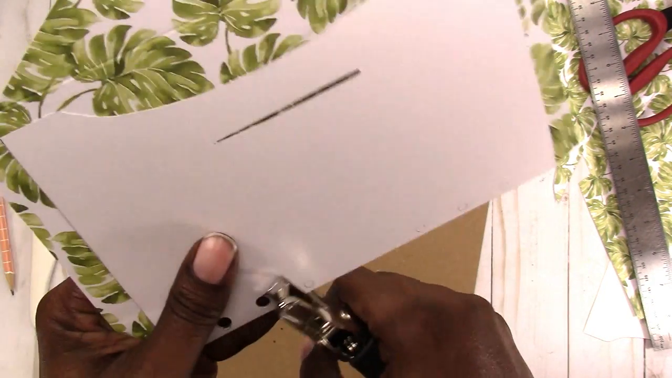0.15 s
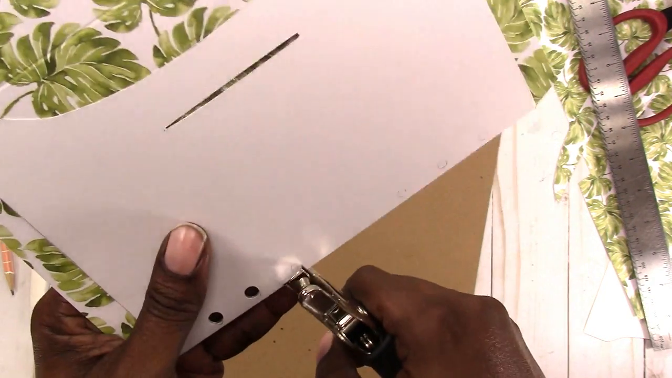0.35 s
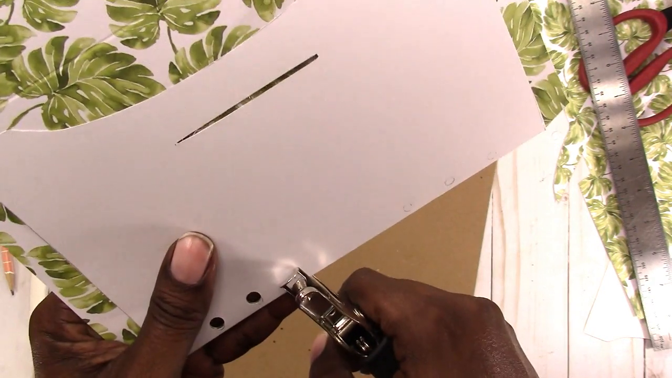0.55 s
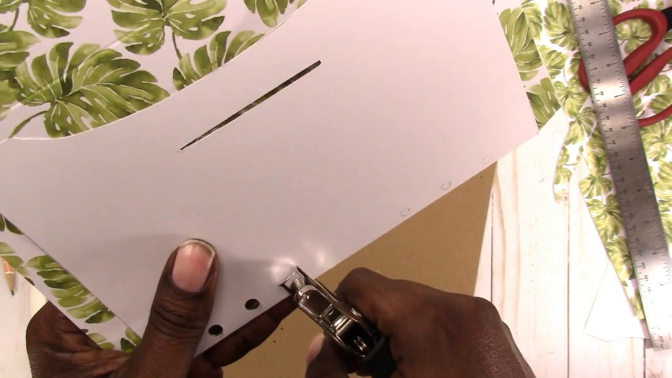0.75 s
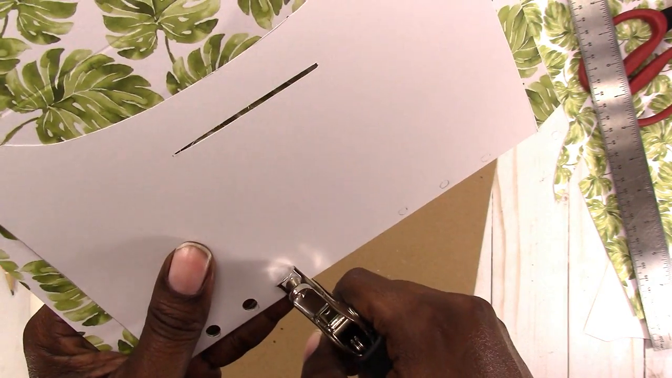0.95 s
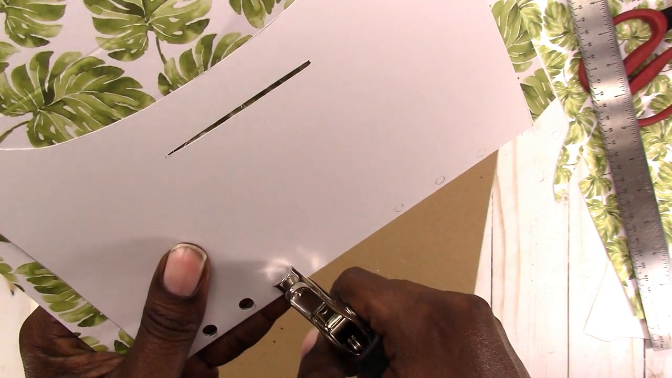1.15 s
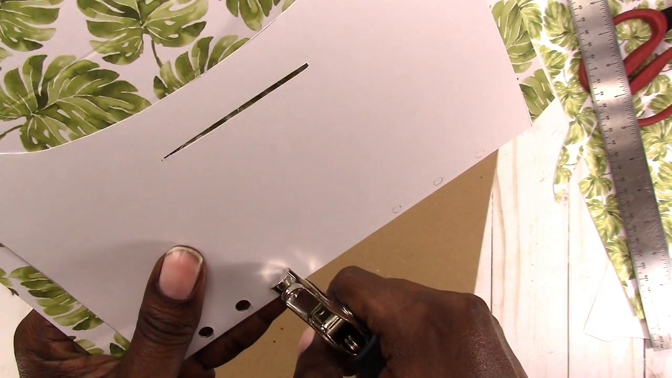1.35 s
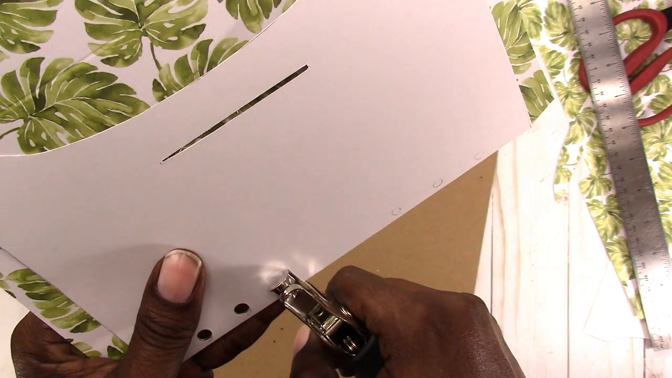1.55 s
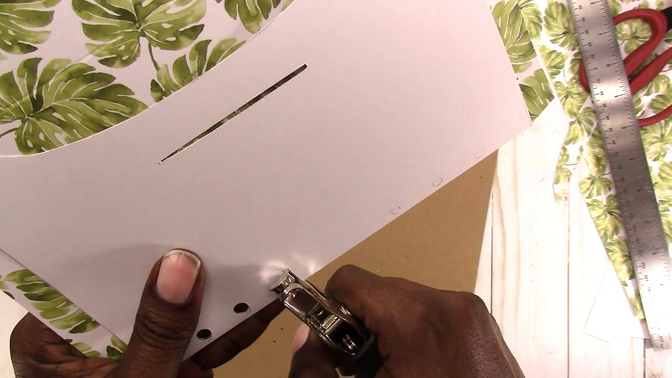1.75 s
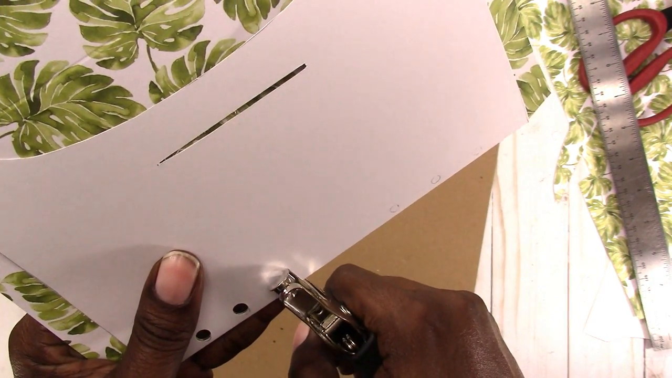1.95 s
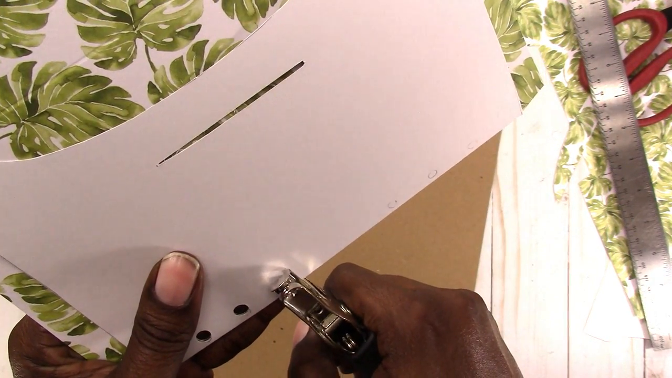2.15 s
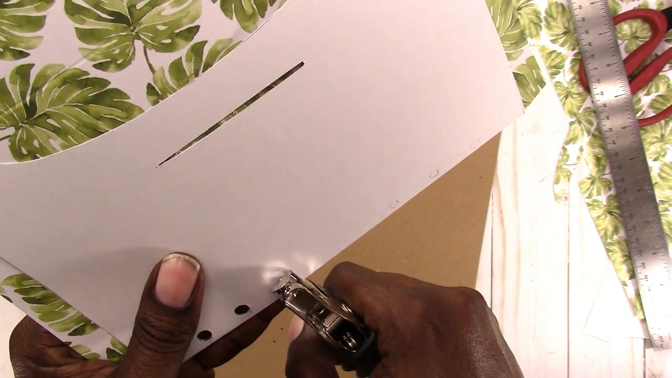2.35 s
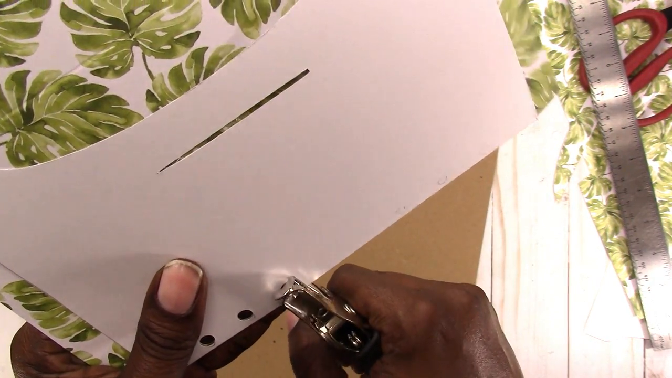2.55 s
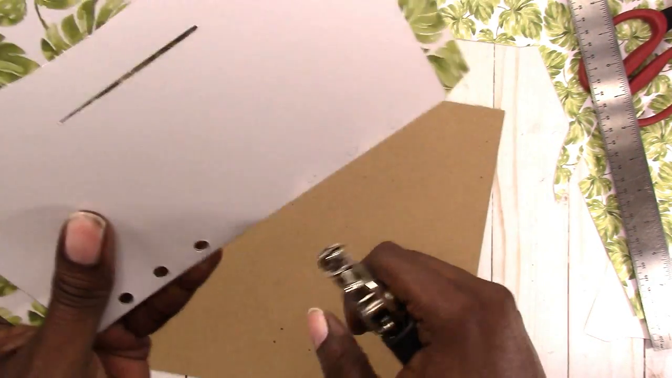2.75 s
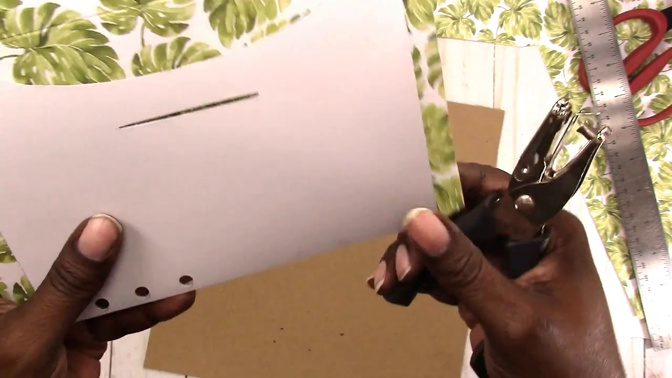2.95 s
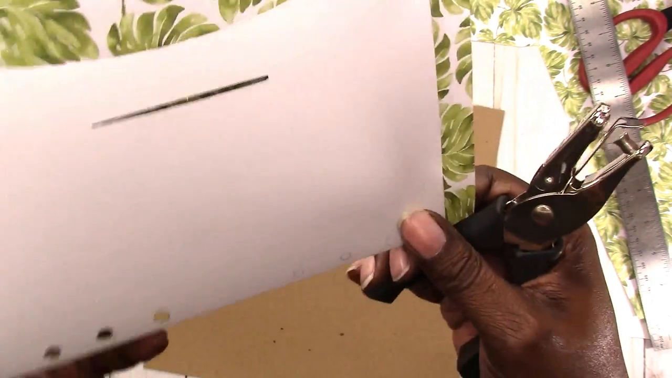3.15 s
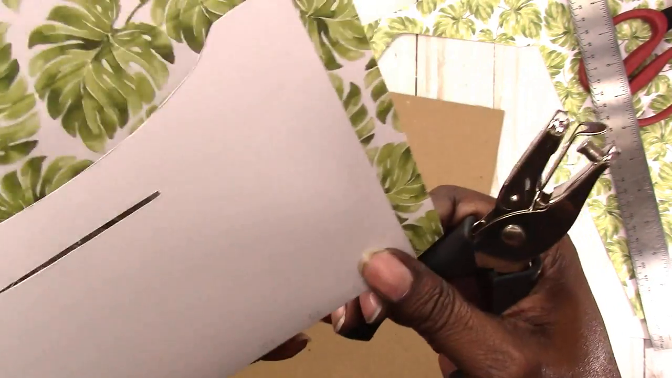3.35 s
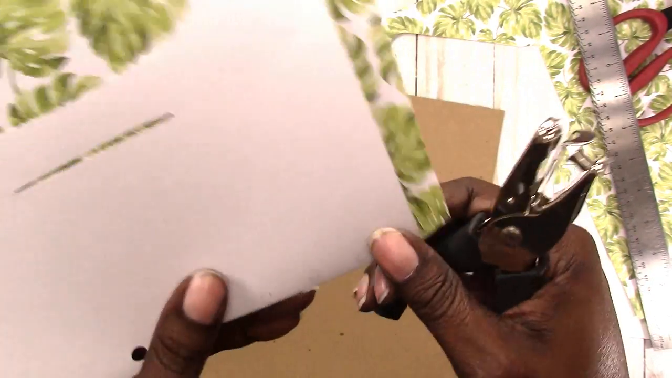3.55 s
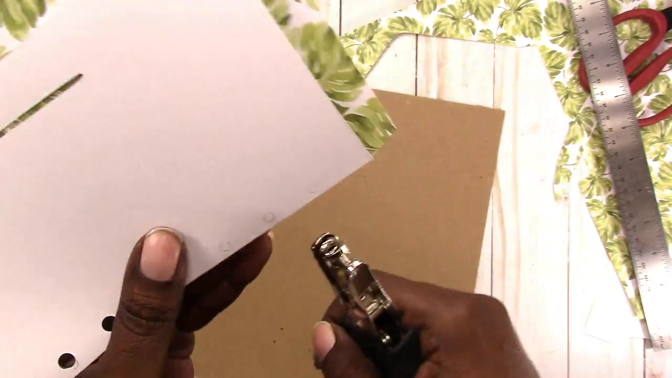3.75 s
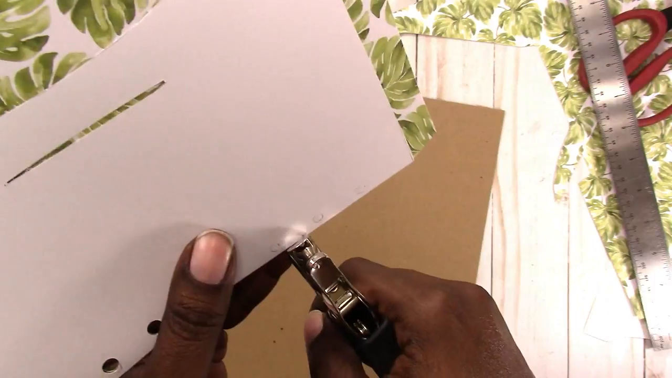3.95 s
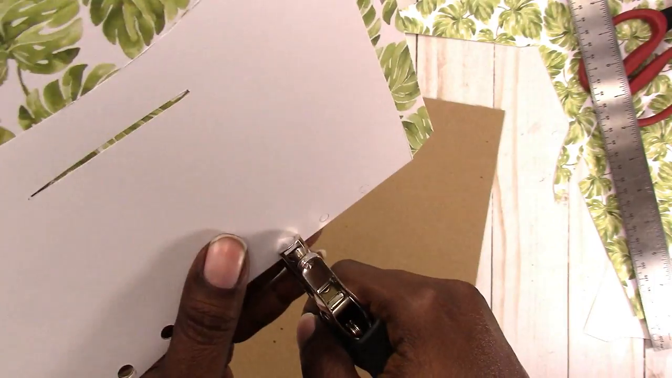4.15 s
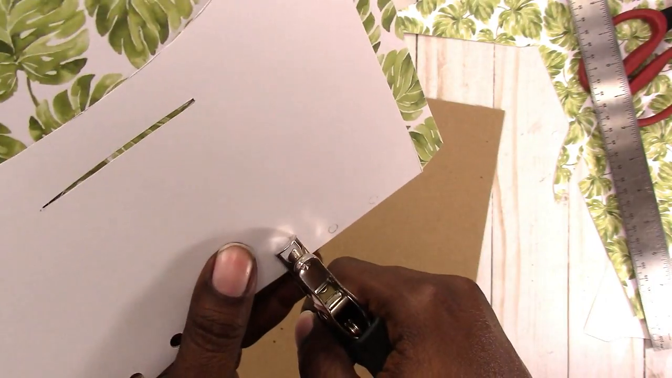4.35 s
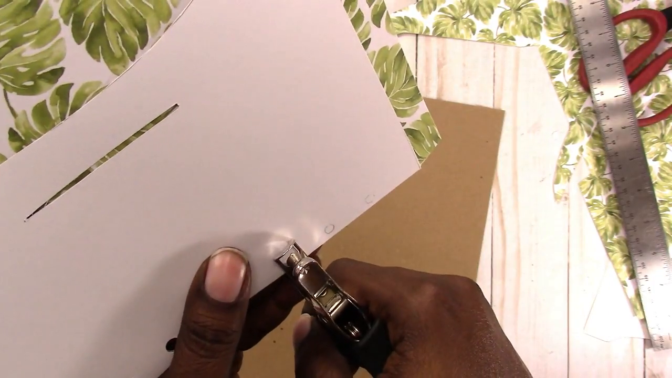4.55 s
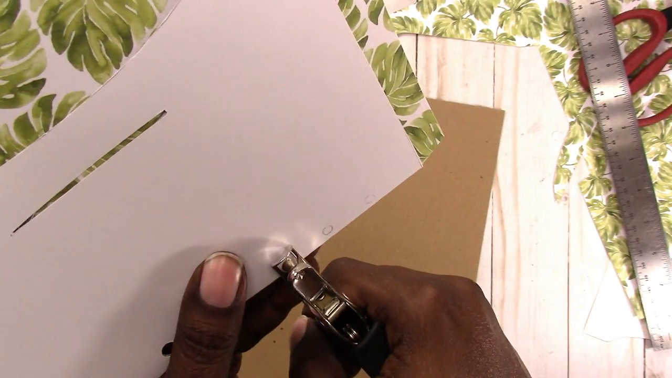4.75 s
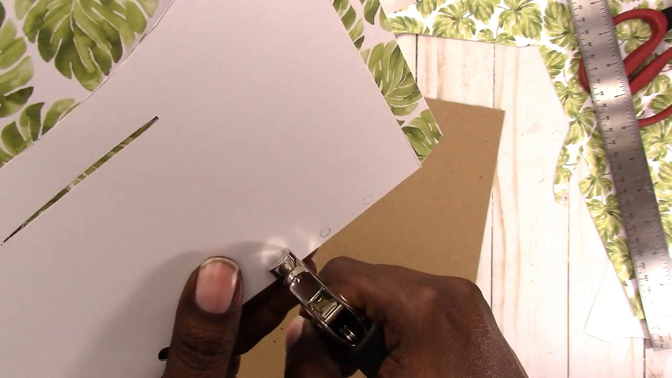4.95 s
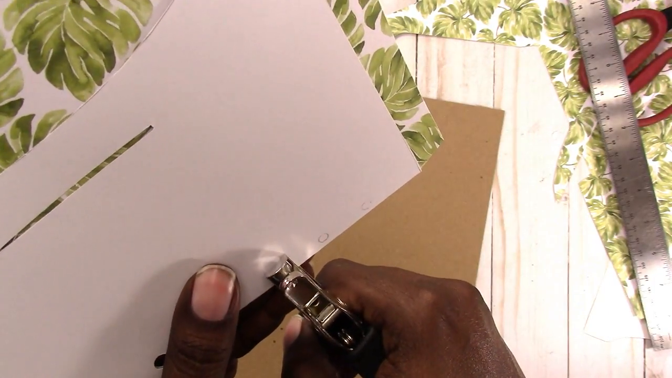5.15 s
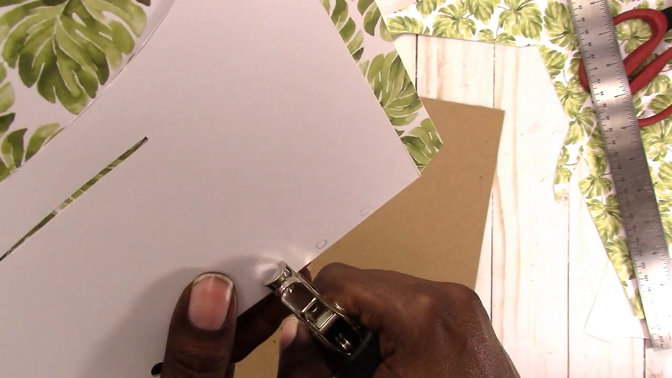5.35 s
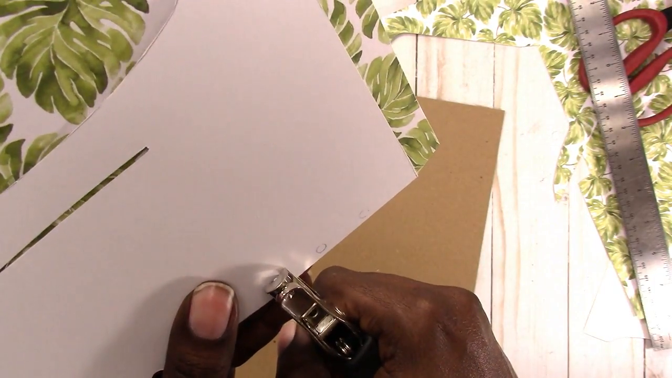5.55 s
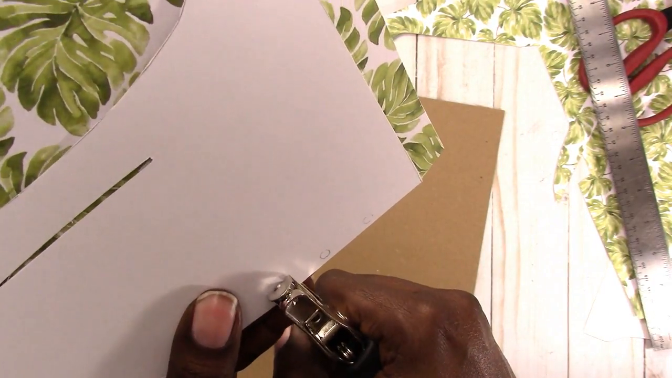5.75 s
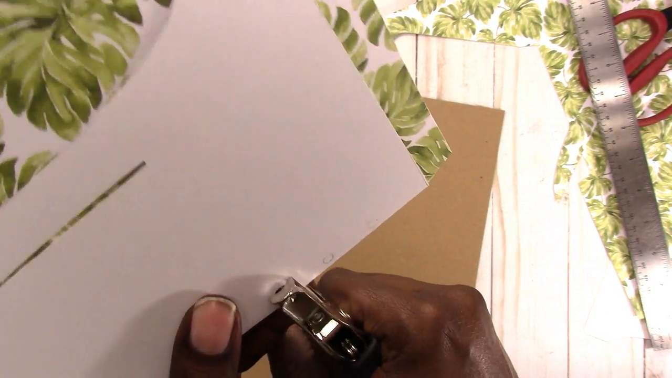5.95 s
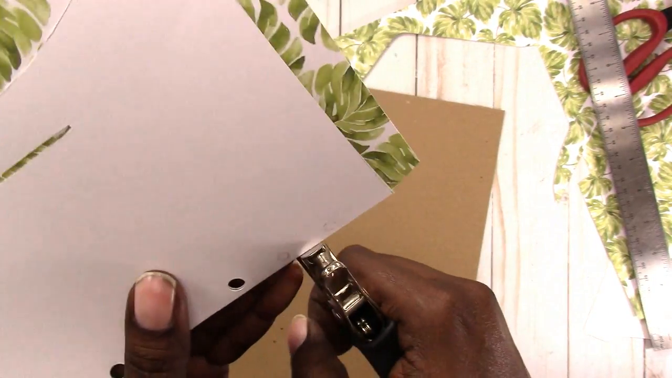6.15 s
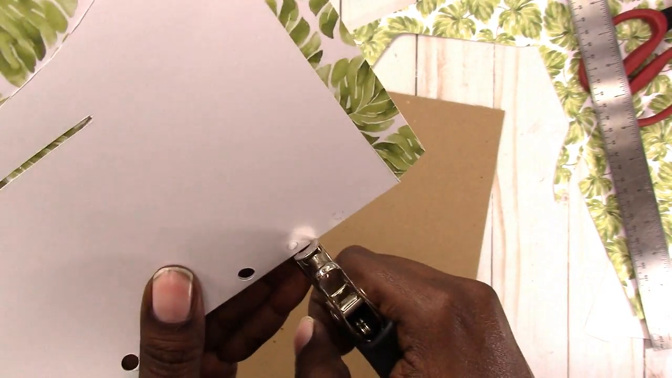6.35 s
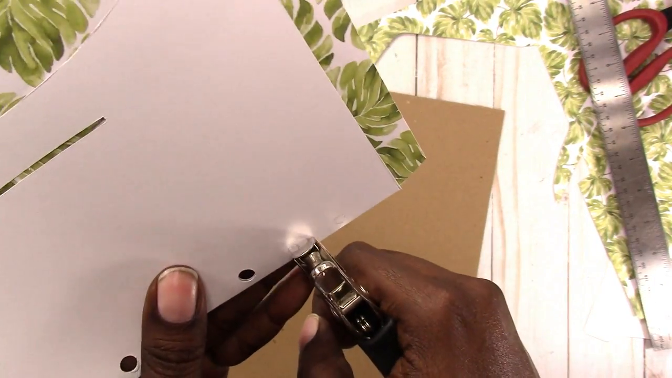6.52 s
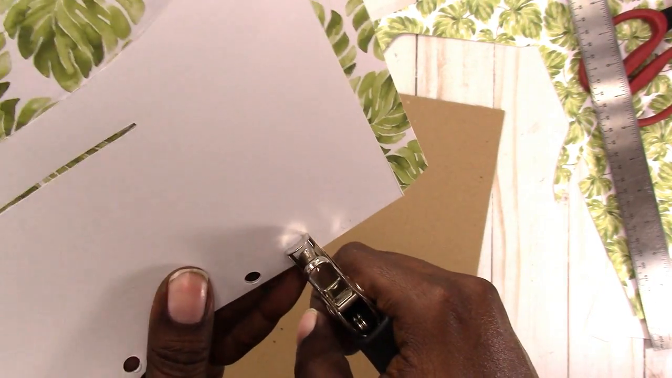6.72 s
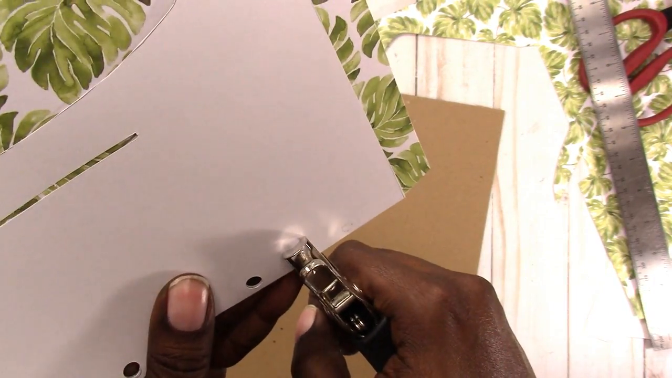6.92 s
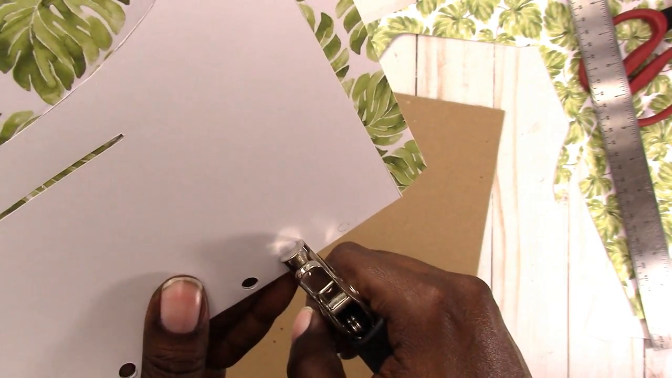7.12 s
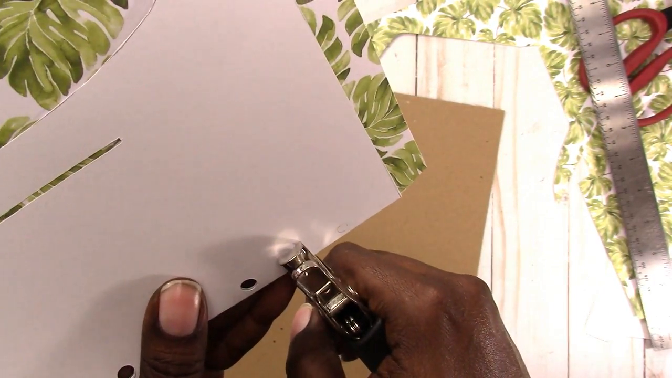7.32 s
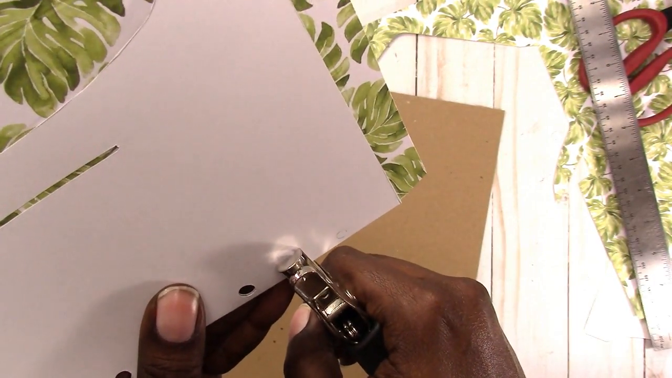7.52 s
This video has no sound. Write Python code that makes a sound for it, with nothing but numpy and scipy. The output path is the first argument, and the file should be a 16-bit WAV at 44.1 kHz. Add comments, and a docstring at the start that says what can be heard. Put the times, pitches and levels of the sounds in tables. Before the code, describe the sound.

A handheld steel punch clacks sharply through stiff card three times, each bite followed by a papery release snap, with a faint slide between.

```python
"""Plier punch and card

A steel plier punch cuts three holes in a sheet of card, over a craft table in a small room.
Each squeeze cracks the card by fibre noise and clacks on the stop by struck modes and a joint rattle.
On release the sheet flaps in its own modes; the pin's drag out of the last hole is a stick-slip pulse train.
The turned card slides as friction noise with a moving resonance, over coloured room noise and hum.
"""
import sys
import numpy as np
from scipy import signal
from scipy.fft import rfft, irfft
from scipy.io import wavfile
from scipy.ndimage import uniform_filter1d

SR = 44100
rng = np.random.default_rng(int(sys.argv[2]) if len(sys.argv) > 2 else 0)


def store_wav(level_fs):
    """Save 16-bit WAV to argv[1]."""
    pcm = np.round(np.clip(np.atleast_2d(level_fs), -1, 1) * 32767)
    wavfile.write(sys.argv[1], SR, pcm.T.astype(np.int16))


N = 338688

# the pin breaks through, then the jaws hit their stop:
# start_s, ring_db, stop_share (0-1), crack_db, crack_t60_s, sheet_jolt_db
SQUEEZES = [(-0.066, -1.5, 0.83, 4.5, 0.0095, -13), (2.529, -6.5, 0.3, -11.5, 0.022, -21),
            (2.5559, -2, 0.98, 2.5, 0.027, -7.5), (5.9132, -8.5, 0.12, -12, 0.024, -35),
            (5.9307, -2.5, 1, 1, 0.032, -13.5)]
# modes of the steel punch: mode_hz, breakthrough_db, stop_db, t60_s
STEEL_MODES = [(1007, -16, -4, 0.081), (1120, -10, -6, 0.033), (1240, -2.5, -16, 0.031),
               (1399, -14.5, -16.5, 0.14), (1571, -5.5, 1.5, 0.035), (1673, -3, -18, 0.035),
               (1853, 5, -25, 0.036), (2070, -4.5, -7.5, 0.037), (2630, -15, 3, 0.0124),
               (3196, -10, -0.5, 0.02), (4100, -9.5, -18.5, 0.0157), (4700, -22.5, -8, 0.021),
               (5016, -19.5, -4.5, 0.036), (5340, -11, -10.5, .018), (7190, -31.5, -5, 0.024)]
# spectrum of the breaking card: frequency_hz, density_db
CRACK_COLOUR = [(60, -15.5), (180, 2), (380, -9), (650, -2), (1100, 5), (2400, -1.5), (4700, 3.5),
                (6300, -5), (10000, -2.5), (13000, -12.5), (16000, -28.5)]
# spectrum of the loose joint: frequency_hz, density_db
RATTLE_COLOUR = [(500, -36), (900, -28), (1100, 17), (1350, -0.5), (1650, 4), (2100, 8), (2600, -18),
                 (5000, -32), (12000, -47)]

# the sheet jerks off the pin:
# start_s, flap_db, pitch_factor, slap_db, slap_t60_s, edge_tick_db, rebound_s
RELEASES = [(0.0898, -11, 0.97, -6, 0.063, -11, 0.0124), (2.7078, -4.5, 0.944, -15, 0.1, -13.5, 0.014),
            (6.0948, -11, 1.055, -16, 0.099, -13.5, 0.0094)]
# catch, jerk and rebound of every release, levels relative to it:
# delay_in_rebounds, flap_db, pitch_factor, slap_db, edge_tick_db
RECOIL = [(-1.2, -20, 0.88, -13.5, -15), (0, -0.5, 1, 0, -2), (0.97, -10.5, 1.22, -13, -21)]
# single swings and knocks of the sheet; a short stiff span rings higher:
# start_s, flap_db, pitch_factor, slap_db
FLAPS = [(0.1245, -15.5, 0.97, -46), (0.1305, -22, 0.95, -30), (0.164, -27, 0.61, -32.5),
         (0.2144, -26, 0.51, -45), (0.2235, -29, 0.95, -34), (0.953, -62, 2.7, -44),
         (2.7567, -18, 0.98, -26), (2.797, -29.5, 0.9, -58), (3.053, -19, 0.7, -30),
         (3.071, -26.5, 1.01, -39.5), (3.3188, -58, 1, -36), (3.5139, -41, 0.69, -41),
         (3.545, -30, .55, -42), (4.024, -34.5, 2.45, -38.5), (5.948, -23.5, 0.69, -38),
         (6.0968, -15, 1.95, -27)]
# modes of the held sheet before the pitch factor: mode_hz, mode_db, nominal_t60_s
SHEET_MODES = [(170, -13.5, 0.042), (246, -12, 0.056), (337, -4, 0.04), (376.7, -1.5, 0.08),
               (498, -14, 0.078), (777, -11, 0.049)]
# light touches of steel and card edge: start_s, tick_db, t60_s
TICKS = [(0.0618, -27.5, 0.03), (0.142, -30, 0.04), (0.954, -47, 0.0086), (2.683, -15.5, 0.015),
         (2.761, -38, 0.01), (2.8321, -49, .012), (2.873, -51, 0.011), (3.0824, -35, 0.017),
         (3.1116, -36, 0.0057), (3.5144, -45, .009), (3.6317, -42, .015), (4.0243, -39, 0.0084),
         (4.388, -50.5, .012), (4.6689, -50, 0.011), (6.0696, -19.5, 0.0063), (6.078, -19.5, 0.025),
         (6.1036, -17.5, 0.0098)]
# spectrum of the slapped surface: frequency_hz, density_db
SLAP_COLOUR = [(50, -24), (170, -5.5), (400, -8.5), (600, -7.5), (770, 0.5), (950, -5), (1250, -2),
               (2000, -10.5), (3200, -9), (5000, -19.5), (12000, -53)]
# spectrum of edge ticks and pin drag: frequency_hz, density_db
EDGE_COLOUR = [(200, 6.5), (1500, -14), (3500, -1), (5200, 5.5), (7500, 7.5), (10500, 2), (13500, -4.5),
               (16000, -20)]

# the pin scrapes, creaks, then rasps free: start_s, end_s, mean_slips_per_s, level_db
DRAG = [(6.065, 6.09, 1100, -41), (6.116, 6.126, 420, -22.5), (6.13, 6.167, 2300, -27)]

# hand movements that turn the sheet: fastest_s, level_db, rise_s, fall_s, resonance_at_fastest_hz
PUSHES = [(3.198, -40.5, 0.018, 0.026, 2890), (3.233, -42, 0.022, 0.02, 2550),
          (3.299, -29, 0.088, 0.022, 3240), (3.322, -31.5, 0.0082, 0.071, 2180)]
# spectrum of sliding friction before the resonance: frequency_hz, density_db
SLIDE_COLOUR = [(150, -1), (700, -5), (1400, -4.5), (2300, -4.5), (3400, -2), (4800, -2.5), (6500, -4),
                (9000, -9.5), (15000, -24)]

# fingertips and jaws brush the card; a light glide is airy:
# firmest_s, level_db, rise_s, fall_s, airy_share (0-1)
BRUSHES = [(.232, -40.5, 0.048, 0.038, 0.06), (.293, -42.5, 0.067, 0.039, .85),
           (.329, -42.5, 0.016, 0.015, 0.53), (.398, -51.5, 0.026, 0.13, 0.15),
           (2.922, -49, 0.047, 0.038, 0), (3.064, -42, 0.034, 0.066, 0.13), (3.395, -41, 0.056, 0.077, .4),
           (3.54, -39.5, 0.048, 0.032, 0.28), (3.49, -48, 0.036, 0.035, 0.36),
           (3.6, -52, 0.063, 0.074, 0.3), (3.85, -50, 0.034, 0.066, 0.2), (4.103, -53, 0.057, 0.067, 0.14),
           (4.248, -55, 0.038, 0.11, 0.16), (6.231, -53.5, 0.025, 0.13, 0),
           (6.36, -53.5, 0.061, 0.12, 0.04), (6.63, -58, 0.38, 0.2, 0.25), (6.78, -57, 0.037, .11, .3)]
# spectrum of light brushing: frequency_hz, density_db
HISS_COLOUR = [(1000, 0), (3000, 3), (4800, 2), (7000, -2), (10000, -4.5), (12500, -15), (16000, -45)]

# reflections from table, ceiling and wall: delay_s, level_db
ECHOES = [(0.013, -17), (0.0297, -26.5), (0.0442, -29.5)]
# spectrum of the diffuse decay: frequency_hz, density_db
ROOM_COLOUR = [(80, -7), (350, 3.5), (700, 3.5), (1500, 4), (2600, 1.5), (5000, -0.5), (9000, -2),
               (15000, -1.5)]
# spectrum of the room noise: frequency_hz, density_db
AMBIENCE_COLOUR = [(20, -38), (45, -21), (60, -21.5), (85, -19), (115, -6), (180, -8), (250, -5), (400, -2),
                   (620, -8), (1000, -9), (1650, -13.5), (2300, -20), (5000, -25.5), (9000, -33.5),
                   (14500, -46), (16000, -40)]
# partials of the faint hum: partial_hz, mean_level_db
HUM = [(60, -71), (120, -66.5), (243, -61.5)]

LEAD = SR // 5  # samples computed ahead of the audible start
TIME = np.arange(-LEAD, N) / SR  # s, scene clock
AGE = np.arange(SR // 4) / SR  # s since an impact
STEREO_SIGN = np.array([[1], [-1]])  # left, right


def squeezes(rattle_db=-13, rattle_t60=0.074):
    """Fracture and impact: tearing fibres crack, the stop excites the steel's modes and its loose joint."""
    body, crack, rattle = np.zeros((3, len(TIME)))
    mode_hz, bite_db, stop_db, mode_t60 = np.transpose(STEEL_MODES)
    for start, ring_db, stop_share, crack_db, crack_t60, jolt_db in SQUEEZES:
        mode_db = (1 - stop_share) * bite_db + stop_share * stop_db
        steel_modes = np.c_[mode_hz, mode_db, mode_t60]
        steel = ring(steel_modes, ring_db, twist=1.51, detune=0.01)
        add(body, start, steel + ring(SHEET_MODES, jolt_db))
        add(crack, start, burst(crack_db, crack_t60))
        add(rattle, start, stop_share * burst(ring_db + rattle_db, rattle_t60))
    return body + colour(crack, CRACK_COLOUR) + colour(rattle, RATTLE_COLOUR)


def blows():
    """Impact on a plate: flaps excite the sheet's modes and slap its surface; touches tick and ring steel."""
    body, slap, edge = np.zeros((3, len(TIME)))
    for start, flap_db, pitch, slap_db, slap_t60, tick_db in contacts():
        sheet_modes = np.array(SHEET_MODES) * [pitch, 1, 1]
        add(body, start, ring(sheet_modes, flap_db, length=0.99, twist=1.84))
        add(slap, start, burst(slap_db, slap_t60))
        add(edge, start, burst(tick_db, 0.62 * slap_t60))
    stop_modes = np.delete(STEEL_MODES, 1, axis=1)  # leaves out the breakthrough levels
    steel_below_tick_db = -12
    for start, tick_db, tick_t60 in TICKS:
        add(body, start, ring(stop_modes, tick_db + steel_below_tick_db, twist=1.0))
        add(edge, start, burst(tick_db, tick_t60))
    return body + colour(slap, SLAP_COLOUR) + colour(edge, EDGE_COLOUR)


def contacts(flap_t60=0.052, flap_edge_db=-10):
    """Elastic recoil: each release catches, jerks and rebounds; the other flaps come singly."""
    for start, flap_db, pitch, slap_db, slap_t60, tick_db, rebound_s in RELEASES:
        for delay, more_flap_db, stiffer, more_slap_db, more_tick_db in RECOIL:
            yield (start + delay * rebound_s, flap_db + more_flap_db, pitch * stiffer,
                   slap_db + more_slap_db, slap_t60, tick_db + more_tick_db)
    for start, flap_db, pitch, slap_db in FLAPS:
        yield start, flap_db, pitch, slap_db, flap_t60, slap_db + flap_edge_db


def drag(jitter=0.15, slip_t60=0.0028, rise_s=0.005, fall_s=0.0027):
    """Stick-slip: the pin holds and lets go in the hole, each slip a decaying grain of noise."""
    travel = np.cumsum(np.exp(jitter * walk(500))) / SR  # s, at an uneven speed
    grit = noise()
    scrape = 0
    for start, end, slip_rate, db in DRAG:
        since_slip = slip_rate * travel % 1 / slip_rate
        slips = grit * fade(since_slip, slip_t60)
        scrape = scrape + unit(slips) * undb(db + stroke(start, end, rise_s, fall_s))
    return colour(scrape, EDGE_COLOUR)


def turn(width_octaves=0.3, resonance_db=15, bend_octaves_per_db=0.21):
    """Driven resonance: friction excites the sheet, and a harder push bends it and raises its pitch."""
    rub = colour(fibres(catch_db=2.1, grain_db=2.0), SLIDE_COLOUR)
    hz, frame_s, frames = signal.stft(rub, SR, nperseg=256)
    slide = 0
    for fastest, db, rise, fall, top_hz in PUSHES:
        effort_db = stroke(fastest, fastest, rise, fall)
        bend_db = np.interp(frame_s + TIME[0], TIME, np.maximum(effort_db, -10))
        centre_hz = top_hz * 2 ** (bend_octaves_per_db * bend_db)
        distance = np.log2((hz[:, None] + 1) / centre_hz)  # octaves
        bent = frames * undb(resonance_db * np.exp(-0.5 * (distance / width_octaves) ** 2))
        song = signal.istft(bent, SR)[1][:len(TIME)]
        slide = slide + unit(song) * undb(db + effort_db)
    return slide


def rustle(airy_hz=6340):
    """Light sliding friction: brushes mix grainy noise with an airy, high-passed hiss by power."""
    full = colour(fibres(catch_db=4.0, grain_db=3.5), HISS_COLOUR)
    high_pass = signal.butter(2, airy_hz, "high", fs=SR, output="sos")
    airy = unit(signal.sosfilt(high_pass, colour(noise(), HISS_COLOUR)))
    power = np.zeros((2, len(TIME)))
    for firmest, db, rise, fall, airy_share in BRUSHES:
        brush_power = undb(db + stroke(firmest, firmest, rise, fall)) ** 2
        power += np.outer([1 - airy_share, airy_share], brush_power)
    return full * np.sqrt(power[0]) + airy * np.sqrt(power[1])


def fibres(catch_db, grain_db, snaps_per_s=260, snap_db=13):
    """Dry friction: fine grains catch and let go, and stiff fibres snap at random moments."""
    grains = unit(noise() * undb(catch_db * walk(110) + grain_db * walk(1200)))
    snapping = rng.random(len(TIME)) < snaps_per_s / SR
    snaps = snapping * noise() * undb(snap_db)
    return unit(grains + snaps)


def stroke(start, end, rise, fall):
    """Hand movement in dB: swells by 20 dB over rise, holds from start to end, fades likewise over fall."""
    away = np.maximum(start - TIME, 0) / rise + np.maximum(TIME - end, 0) / fall
    return -20 * np.minimum(away, 10) ** 1.54  # exponent 1 = pointed, 2 = rounded


def ring(modes, db, length=1, twist=2.9, detune=0.022, scatter_db=1.5):
    """Modal superposition: struck modes lag by twist radians in turn; the grip shifts them per blow."""
    chance = rng.standard_normal((len(modes), 2))
    total = 0
    for k, ((hz, mode_db, t60), (shift, scatter)) in enumerate(zip(modes, chance)):
        amplitude = undb(db + mode_db + scatter_db * scatter) * fade(AGE, t60 * length)
        phase = 2 * np.pi * hz * (1 + detune * shift) * AGE - k * twist
        total = total + amplitude * np.sin(phase)
    return total


def burst(db, t60):
    """Summed micro-impacts: a dying spray of noise that starts at the given rms level."""
    envelope = fade(AGE, t60)
    spray = rng.standard_normal(len(AGE)) * envelope
    return undb(db) * spray * np.linalg.norm(envelope) / np.linalg.norm(spray)


def room(direct, send, width_db=-24, tail_width_db=-16):
    """Reflection and diffusion: echoes and a tail follow; scatter and a second tail part the channels."""
    common = tail()
    for delay, db in ECHOES:
        common[int(delay * SR)] += undb(db)
    scatter = burst(0, 0.02)
    scatter /= np.linalg.norm(scatter)
    mid = direct + signal.oaconvolve(send, common)[:len(direct)]
    side = undb(tail_width_db) * signal.oaconvolve(send, tail())[:len(direct)]
    side += undb(width_db) * signal.oaconvolve(direct, scatter)[:len(direct)]
    return mid + side * STEREO_SIGN


def tail(tail_db=-15, t60_low=0.32, t60_high=0.31, build_s=0.004):
    """Reverberant decay: diffuse noise builds up and dies away, the treble slightly faster."""
    t = np.arange(SR // 2) / SR
    white = rng.standard_normal(len(t))
    low = signal.sosfilt(signal.butter(2, 4000, fs=SR, output="sos"), white)
    decay = low * fade(t, t60_low) + (white - low) * fade(t, t60_high)
    decay *= 1 - np.exp(-t / build_s)
    return undb(tail_db) * colour(decay / np.linalg.norm(decay), ROOM_COLOUR)


def ambience(noise_db=-48.5, width_db=-12.5, lean_db=-0.25):
    """Stationary noise: a coloured room sound, partly decorrelated in stereo, with a wavering hum."""
    mid = undb(noise_db) * colour(noise(), AMBIENCE_COLOUR)
    side = undb(noise_db) * colour(noise(), AMBIENCE_COLOUR)
    hum = 0
    for hz, db in HUM:
        amplitude = undb(db + 2 * walk(3.6)) * np.sqrt(2)
        hum = hum + amplitude * np.sin(2 * np.pi * hz * TIME + 0.47 * walk(27))
    stereo = mid + hum + undb(width_db) * side * STEREO_SIGN
    return stereo * undb(lean_db * STEREO_SIGN)  # the right is slightly louder


def undb(db):
    """Logarithmic level: decibels to amplitude gain."""
    return 10 ** (np.asarray(db) / 20)


def unit(x):
    """Mean power: scale to rms 1."""
    return x / np.sqrt(np.mean(x ** 2))


def noise():
    """White noise: equal power at all frequencies, for the whole scene."""
    return rng.standard_normal(len(TIME))


def fade(t, t60):
    """Exponential damping: falls by 60 dB in t60 seconds."""
    return np.exp(-np.log(1000) * t / t60)


def walk(rate):
    """Band-limited chance: random points, rate per second, joined by lines and scaled to rms 1."""
    return unit(np.interp((TIME - TIME[0]) * rate, np.arange(len(TIME)), noise()))


def colour(x, points, size=4096):
    """Minimum phase: a causal filter of unit energy, shaped by (Hz, dB) points."""
    hz, db = np.transpose(points)
    bin_hz = np.arange(size // 2 + 1) * SR / size
    log_gain = np.log(undb(np.interp(np.log(bin_hz + 1), np.log(hz), db)))
    cepstrum = irfft(log_gain)[:size // 2]
    cepstrum[1:] *= 2  # folding the cepstrum makes the response causal
    response = irfft(np.exp(rfft(cepstrum, size)))
    return signal.oaconvolve(x, response / np.linalg.norm(response))[:len(x)]


def add(track, s, sound):
    """Linear superposition: mix a sound into a track at time s."""
    start = LEAD + int(s * SR)
    track[start:start + len(sound)] += sound[:len(track) - start]


def scene(radiate_hz=135, card_send_db=-5):
    """Radiation: the punch radiates all round, the flat sheet sounds drier; neither gives much bass."""
    low_cut = signal.butter(3, radiate_hz, "high", fs=SR, output="sos")
    steel = signal.sosfilt(low_cut, squeezes())
    card = signal.sosfilt(low_cut, blows() + drag() + turn() + rustle())
    in_room = room(steel + card, steel + undb(card_send_db) * card)
    return (in_room + ambience())[:, LEAD:]


def record(dry, ceiling_db=2, release_db_per_s=200, top_hz=15800):
    """Gain reduction: a fast limiter ducks peaks and recovers; the rest clips softly and the top is cut."""
    peak_db = 20 * np.log10(np.abs(dry).max(axis=0) + 1e-9)
    over_db = np.maximum(peak_db - ceiling_db, 0)
    recovery_db = release_db_per_s * np.arange(N) / SR
    duck_db = np.maximum.accumulate(over_db + recovery_db) - recovery_db
    limited = dry * undb(-uniform_filter1d(duck_db, size=32))
    clipped = limited / (1 + (limited / 0.95) ** 6) ** (1 / 6)
    top_cut = signal.ellip(10, 0.2, 90, top_hz, fs=SR, output="sos")
    return signal.sosfilt(top_cut, clipped)


dry = scene()
out = record(dry)
store_wav(out)
```